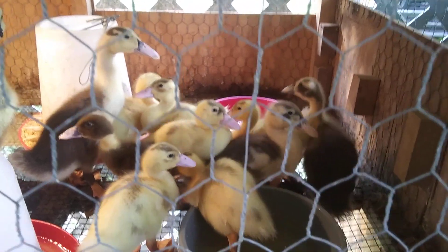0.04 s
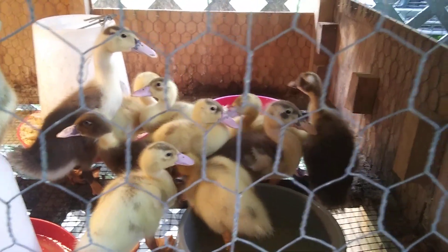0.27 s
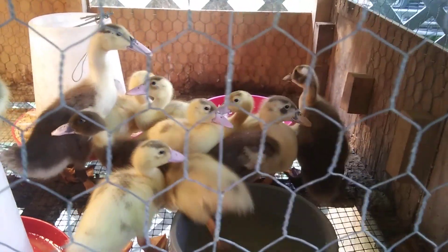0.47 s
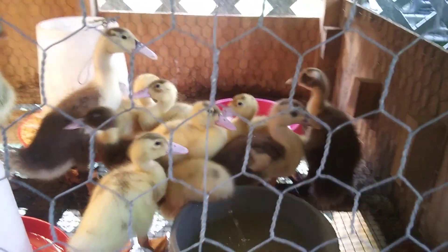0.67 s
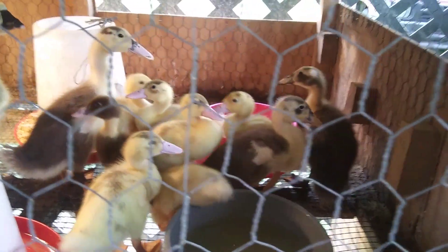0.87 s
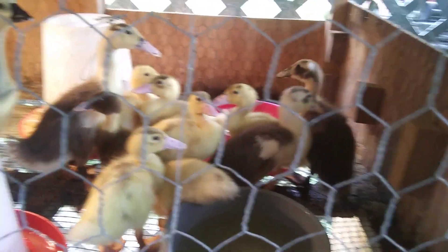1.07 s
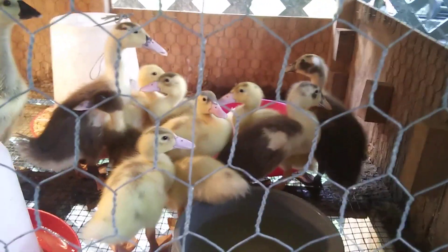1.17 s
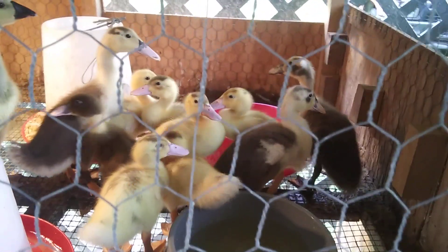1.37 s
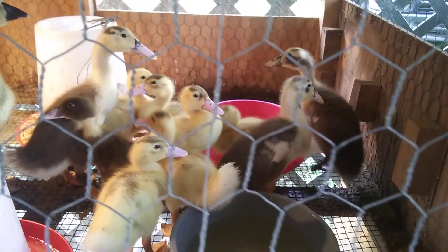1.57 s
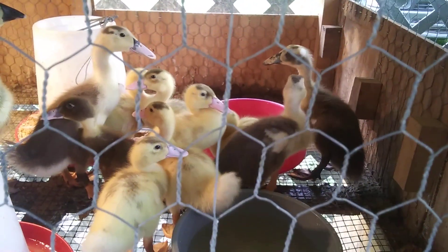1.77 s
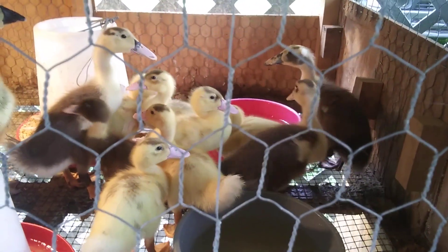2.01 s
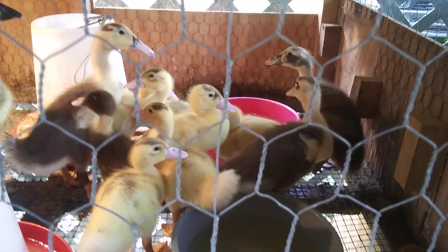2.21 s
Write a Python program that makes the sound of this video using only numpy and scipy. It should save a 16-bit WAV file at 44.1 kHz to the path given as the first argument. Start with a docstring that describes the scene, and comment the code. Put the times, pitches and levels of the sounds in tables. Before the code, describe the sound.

Ducklings give brief, high, fluttering peeps while feet and bills knock and tick in a box

```python
"""Ducklings in a plywood brooder box with a wire floor, over soft air, shuffling, hiss and a faint high whine.
Feet and bills knock from the start: bursts of ringing modes, each with a crack and a boomy tail.
Two thin, arching peeps (fluttering near-sines with weak overtones) come early, amid pips and claw ticks.
After a run of knocks, two faint peeps lead to more pips and ticks, windowed tones and noise clicks.
Knocks and three more peeps close the scene; peeps, pips and ticks get a short reply from the box."""
import sys
import numpy as np
from scipy import signal
from scipy.fft import rfft, irfft, next_fast_len
from scipy.io import wavfile
from scipy.ndimage import uniform_filter1d, map_coordinates

SR = 44100
rng = np.random.default_rng(int(sys.argv[2]) if len(sys.argv) > 2 else 0)


def log_audio(samples):
    """Write samples as a 16-bit WAV file to the path given in sys.argv[1]."""
    # one column per channel
    frames = np.atleast_2d(samples).T
    # limit to full scale, then quantise
    limited = np.clip(frames, -1, 1)
    pcm = np.round(limited * 32767).astype(np.int16)
    wavfile.write(sys.argv[1], SR, pcm)


N = 99225
JITTER_KNOTS_PER_S = 420  # pitch roughness of peeps and pips


def amp(db):
    """Decibels to gain."""
    return 10 ** (np.asarray(db) / 20)


def unit(x):
    """Scale to rms 1."""
    return x / np.sqrt(np.mean(x ** 2) + 1e-20)


def along(points, hz):
    """Read (Hz, value) points on a log-frequency axis."""
    point_hz, values = np.transpose(points)
    return np.interp(np.log(hz + 1), np.log(point_hz + 1), values)


def curve(rows):
    """Interpolate (s, value) points to one value per sample."""
    return np.interp(np.arange(N) / SR, *np.transpose(rows))


def wobble(knots_per_s):
    """Smooth random curve through normal knots."""
    knots = rng.standard_normal(4096)
    return map_coordinates(knots, [np.arange(N) * knots_per_s / SR], mode="mirror")


def noise(colour, size=N):
    """Random-phase noise of rms 1 whose spectrum in dB is colour(Hz)."""
    hz = np.fft.rfftfreq(size, 1 / SR)
    random_phase = np.exp(2j * np.pi * rng.random(len(hz)))
    return unit(irfft(random_phase * amp(colour(hz)), size))


def bump(hz, centre_hz, octaves):
    """Gaussian bell on a log-frequency axis, 1 at its centre."""
    return np.exp(-.5 * (np.log2((hz + 1) / centre_hz) / octaves) ** 2)


def resonances(peaks, hz):
    """Summed gain in dB of (Hz, width Hz, dB) peaks."""
    return sum(db / (1 + ((hz - centre) / width * 2) ** 2) for centre, width, db in peaks)


def steady(x, size=256):
    """Divide noise by its running rms to even out slow swells."""
    return x / np.sqrt(np.abs(uniform_filter1d(x ** 2, size)) + 1e-9)


def add(track, start_s, sound):
    """Mix a sound into the track at start_s."""
    part = track[round(start_s * SR):][:len(sound)]
    part += sound[:len(part)]


def peeps():
    """Near-pure whistle: starts as pulses that merge into a gliding, fluttering tone with weak overtones."""
    # one contour per peep: time_s, pitch_hz, level_db
    contours = [
        [(.368, 1386, -56.5), (.388, 2000, -40), (.398, 2270, -36), (.404, 2447, -38.5), (.415, 2990, -46),
         (.428, 2993, -49.5), (.437, 2550, -36), (.452, 2195, -40), (.473, 2090, -38), (.482, 2106, -41.5),
         (.51, 2115, -51)],
        [(.612, 1930, -57), (.636, 2162, -36.5), (.652, 2606, -40.5), (.662, 3080, -50.5), (.688, 3480, -60),
         (.696, 2684, -46), (.706, 2280, -42.5), (.725, 1840, -58)],
        [(1.378, 2324, -64), (1.4, 2520, -51.5), (1.43, 1884, -54.5)],
        [(1.474, 3260, -65), (1.487, 2540, -54), (1.503, 1930, -55.5)],
        [(1.885, 1820, -57.5), (1.9, 2600, -60), (1.914, 3080, -71), (1.93, 3300, -51.5), (1.95, 3540, -83),
         (1.965, 3400, -63), (1.98, 3210, -65)],
        [(1.952, 2390, -52), (1.962, 2187, -34.5), (1.972, 2174, -56), (2.0, 1990, -54)],
        [(2.195, 1900, -66), (2.21, 2350, -59), (2.226, 3550, -73), (2.238, 3190, -59), (2.25, 2830, -61)],
    ]
    # one voice per peep: pitch_roughness_share, second_harmonic_db, third_harmonic_db
    voices = [(.013, -23, -46), (.018, -20, -38), (.06, -19, -34), (.06, -19, -34), (.03, -8, -28),
              (.007, -28, -44), (.05, -7, -30)]
    # overtone colour: freq_hz, gain_db
    bill_colour = [(3000, -12), (4100, -4), (4450, 7.5), (5000, 4), (5600, 2), (6100, 14), (7000, 6.5),
                   (8200, -6), (12000, -15)]
    flutter_knots_per_s, shimmer_db, overtone_flutter_db = 260, 0.5, 4
    rasp_hz, rasp_s, fade_s = 237, 0.016, 0.005
    t, out = np.arange(N) / SR, np.zeros(N)
    for rows, (roughness, second_db, third_db) in zip(contours, voices):
        time_s, pitch_hz, level_db = np.transpose(rows)
        since_start = t - time_s[0]
        pitch = np.interp(t, time_s, pitch_hz) * (1 + roughness * wobble(JITTER_KNOTS_PER_S))
        phase = 2 * np.pi * np.cumsum(pitch) / SR
        gate = np.clip(np.minimum(since_start, time_s[-1] - t) / fade_s + 1, 0, 1)
        rasp_depth = np.clip(1 - since_start / rasp_s, 0, 1)
        rasp = 1 + rasp_depth * np.cos(2 * np.pi * rasp_hz * since_start)
        tone = np.sin(phase)
        for k, harmonic_db in enumerate([second_db, third_db], 2):
            flutter_db = overtone_flutter_db * wobble(flutter_knots_per_s)
            overtone_db = harmonic_db + along(bill_colour, k * pitch) + flutter_db
            tone = tone + amp(overtone_db) * np.sin(k * phase)
        level = amp(np.interp(t, time_s, level_db) + shimmer_db * wobble(flutter_knots_per_s))
        out += np.sqrt(2) * gate * rasp * level * tone
    return out


def pips():
    """Very short, slightly rough notes: sines in a Gaussian window."""
    # middle_s, pitch_hz, level_db, sigma_s
    pip_rows = [(0.487, 2027, -38, 0.0018), (.5925, 1683, -37, 0.0018), (0.7, 2350, -39, 0.00091),
                (.708, 2224, -39, 0.00093), (1.554, 2200, -32.5, 0.00076), (1.556, 2200, -42, 0.00084),
                (1.604, 2640, -46.5, 0.0024), (1.641, 2650, -39.5, 0.0026)]
    roughness_share = .035
    out = np.zeros(N)
    for middle_s, pitch_hz, level_db, sigma_s in pip_rows:
        t = np.arange(N) / SR - middle_s
        pitch = pitch_hz * (1 + roughness_share * wobble(JITTER_KNOTS_PER_S))
        phase = 2 * np.pi * np.cumsum(pitch) / SR
        window = np.exp(-.5 * (t / sigma_s) ** 2)
        out += amp(level_db) * np.sqrt(2) * window * np.sin(phase)
    return out


def knocks():
    """Each blow cracks and rings the crowded floor and box modes round one pitch; one mode is added as a sine."""
    # start_s, level_db, main_pitch_hz, emphasis_db, crack_db, rise_s, t60_s, mode_hz, mode_db
    blows = [(0.2104, -32, 1990, 8.5, -15, 0.0027, 0.032, 1527, -10),
             (0.216, -31, 1040, 9.5, -28, 0.0037, .12, 921, 2),
             (0.523, -35.5, 1106, 16, -9, 0.0007, 0.16, 1052, -2),
             (.533, -41, 366, 9, -15, 0.0012, 0.13, 473, -6.5),
             (.66, -44, 650, 10, -16, 0.0013, 0.068, 610, -8),
             (.684, -47.5, 1100, 5, 4, 0.0016, 0.084, 1333, -4),
             (.75, -49, 760, -4, -8, 0.0015, 0.094, 677, -10),
             (0.774, -53, 2400, 22, 2, .001, 0.061, 1780, 0),
             (.870, -36, 1290, 0, -3.5, 0.0011, 0.34, 1023, -10),
             (.8905, -19, 1736, 32.5, -16, 0.00099, 0.016, 1707, -19),
             (0.898, -34, 1300, -5, -24, 0.00079, 0.082, 1610, -12),
             (0.9113, -22, 788, 11, -17, 0.0015, 0.1, 808.5, -3),
             (1.064, -43, 625, 12.5, -24, 0.0044, 0.12, 800, -15),
             (1.2373, -45.5, 1840, 16, -8, 0.00059, 0.18, 1956, -8),
             (1.268, -34, 1450, 3, -20, .001, 0.21, 1518, -7),
             (1.290, -28.5, 1360, -3.5, -9.5, 0.0021, 0.071, 1650, -15),
             (1.302, -36, 500, 4, -13, 0.0034, 0.16, 616.5, 6),
             (1.538, -41.5, 1950, 8.5, 1.5, 0.0023, 0.22, 1940, -12),
             (1.648, -31, 1670, 18, -6.5, 0.00073, 0.034, 1637, -7),
             (1.659, -31, 1500, -0.5, -17, 0.0027, 0.072, 1082, -14),
             (1.669, -40, 432, 18, -9, 0.0018, 0.17, 617.5, 3.5),
             (1.930, -25.5, 1250, 7, -40, 0.0013, 0.073, 716, -5),
             (1.937, -34.5, 680, 11.5, -33, 0.0042, 0.17, 556, 1.5),
             (2.133, -51, 2080, 15.5, -1.5, 0.0029, 0.13, 2235, -12),
             (2.201, -48.5, 1900, 20, -0.5, 0.00099, 0.26, 2020, -7),
             (2.229, -39, 930, 7, -27, 0.0038, 0.086, 624, 1.5)]
    # broad colour of floor and box: freq_hz, gain_db
    body_colour = [(40, -70), (130, -65.5), (230, -23.5), (330, -9.5), (500, -4), (700, 0), (1200, -1),
                   (2200, -5), (2700, -11), (3300, -22), (5000, -15), (12000, -36)]
    # peaks of the box: freq_hz, width_hz, gain_db
    box_modes = [(349, 8.3, 4.5), (365, 105, 5), (539, 40, 5), (631, 21, 7), (713, 69, 1), (870, 76, 3.5),
                 (993, 20, -5.5), (994, 55, 9), (1240, 35, 10), (1390, 20, 4), (1530, 50, 2.5),
                 (1597, 120, 4.5), (1716, 21, 3.5), (2170, 17, 2.5)]
    # crack colour: freq_hz, gain_db
    crack_colour = [(1500, -14), (2800, 12.5), (3500, -4.5), (4500, 3.5), (6400, 7.5), (7800, -20),
                    (11000, -32), (16000, -41)]
    # colour of the boom after a blow: freq_hz, gain_db
    tail_colour = [(60, -23), (130, -11), (210, -4.5), (350, 1.5), (700, 1.5), (1500, -10.5), (2500, -17),
                   (4000, -28), (12000, -47)]
    emphasis_octaves, tail_db, tail_rise_s = 0.21, -22.5, 0.007
    crack_t60_s, tail_t60_s, mode_t60_s = 0.035, .32, 0.11
    low_cut_hz, thump_db = 250, -12
    out, t = np.zeros(N), np.arange(SR // 2) / SR

    def box(f):
        """Colour of the struck box in dB."""
        return along(body_colour, f) + resonances(box_modes, f)

    for start_s, level_db, pitch_hz, emphasis_db, crack_db, rise_s, t60_s, mode_hz, mode_db in blows:
        rise = 1 - np.exp(-t / rise_s)
        ring = steady(noise(lambda f: box(f) + emphasis_db * bump(f, pitch_hz, emphasis_octaves), size=len(t)))
        ring *= rise * amp(-60 * np.maximum(t - 2 * rise_s, 0) / t60_s)
        tail = noise(lambda f: along(tail_colour, f), size=len(t))
        tail *= amp(tail_db - 60 * t / tail_t60_s) * (1 - np.exp(-t / tail_rise_s))
        crack = noise(lambda f: along(crack_colour, f), size=len(t))
        crack *= amp(crack_db - 60 * t / crack_t60_s)
        mode = np.sqrt(2) * np.sin(2 * np.pi * (mode_hz * t + rng.random()))
        mode *= amp(mode_db - 60 * t / mode_t60_s) * rise
        add(out, start_s, amp(level_db) * (ring + mode + tail + crack))
    high_pass = signal.butter(2, low_cut_hz, "highpass", fs=SR, output="sos")
    thin = signal.sosfilt(high_pass, out)
    return thin + amp(thump_db) * (out - thin)  # a little of the bass stays


def ticks():
    """Claws and bills catch the wire: small bright noise clicks."""
    # start_s, level_db, pitch_hz
    clicks = [(0.563, -41.5, 5600), (0.669, -41.5, 7900), (0.763, -57, 12000), (0.779, -48, 11400),
              (1.025, -45, 5500), (1.5375, -31, 5100), (1.572, -37, 6300), (1.5745, -45, 13000),
              (1.587, -42, 11800), (1.589, -37, 5740), (1.702, -46, 5800), (1.928, -45, 6600)]
    emphasis_db, emphasis_octaves, rise_s, t60_s = 30, 0.72, 0.00061, 0.016
    out, t = np.zeros(N), np.arange(SR // 8) / SR
    for start_s, level_db, pitch_hz in clicks:
        click = noise(lambda f: emphasis_db * bump(f, pitch_hz, emphasis_octaves), size=len(t))
        envelope = amp(level_db - 60 * t / t60_s) * (1 - np.exp(-t / rise_s))
        add(out, start_s, click * envelope)
    return out


def walls(x):
    """Short reply of the box: convolution with delayed, decaying white noise of unit energy."""
    t60_s, delay_s = 0.089, 0.0017
    t = np.arange(SR // 3) / SR
    tail = noise(lambda f: 0 * f, size=len(t)) * amp(-60 * t / t60_s) * (t > delay_s)
    return signal.fftconvolve(x, tail / np.linalg.norm(tail))[:N]


def background():
    """Room air, shuffling bodies and steady hiss as coloured noise; a thin wavering whine as a sine."""
    # colour of air and shuffling: freq_hz, gain_db
    air_colour = [(25, -29), (90, -22), (170, -14), (300, -1), (600, 3), (1200, 1), (2000, 0), (3000, -8),
                  (4000, -4), (16000, -18)]
    # bodies shuffling: time_s, level_db
    shuffle_levels = [(0, -57.5), (.12, -67), (.35, -59.5), (.7, -54), (.85, -57.5), (1.17, -62.5),
                      (1.42, -54.5), (1.52, -58.5), (1.72, -53), (1.84, -72), (2.1, -63.5), (2.25, -59)]
    # hiss colour: freq_hz, gain_db
    hiss_colour = [(2500, -58), (3500, -60), (3750, -0.5), (4500, 6), (5100, 0.5), (6200, -3.5),
                   (7200, -19), (8800, -0.5), (10200, 5.5), (10800, 1), (11150, -44.5), (13200, -7.5),
                   (14200, -51), (16000, -47)]
    # narrow peaks of the hiss: freq_hz, width_hz, gain_db
    hiss_peaks = [(3680, 78, 6), (4140, 86, 4.5), (4770, 140, 6.5), (10100, 400, 3)]
    # whine: time_s, level_db
    whine_levels = [(0, -65), (1.2, -65.5), (1.6, -60), (1.87, -62.5), (1.91, -65), (1.99, -53),
                    (2.09, -59), (2.15, -66.5), (2.25, -59.5)]
    air_db, hiss_db, shuffle_waver_db = -63.5, -57.5, 1.6
    whine_hz, whine_drift_hz, whine_waver_db = 4464, 10, 1.3
    air = amp(air_db) * noise(lambda f: along(air_colour, f))
    shuffle_level = amp(curve(shuffle_levels) + shuffle_waver_db * wobble(90))
    shuffle = shuffle_level * noise(lambda f: along(air_colour, f))
    hiss = amp(hiss_db) * noise(lambda f: along(hiss_colour, f) + resonances(hiss_peaks, f))
    phase = 2 * np.pi * np.cumsum(whine_hz + whine_drift_hz * wobble(90)) / SR
    whine_level = amp(curve(whine_levels) + whine_waver_db * wobble(40.68))
    whine = np.sqrt(2) * whine_level * np.sin(phase)
    return air + shuffle + hiss + whine


def scene():
    """Voices and ticks with the reply of the box, plus knocks and background."""
    reply_db = -5
    bright = peeps() + pips() + ticks()
    return (bright + amp(reply_db) * walls(bright) + knocks() + background())[None]


def record(dry):
    """Brick-wall band limit: nothing passes from top_hz up."""
    top_hz = 15800
    size = next_fast_len(N + SR // 2)
    passband = np.fft.rfftfreq(size, 1 / SR) < top_hz
    return irfft(rfft(dry, size) * passband, size)[..., :N]


dry = scene()
out = record(dry)
log_audio(out)
```